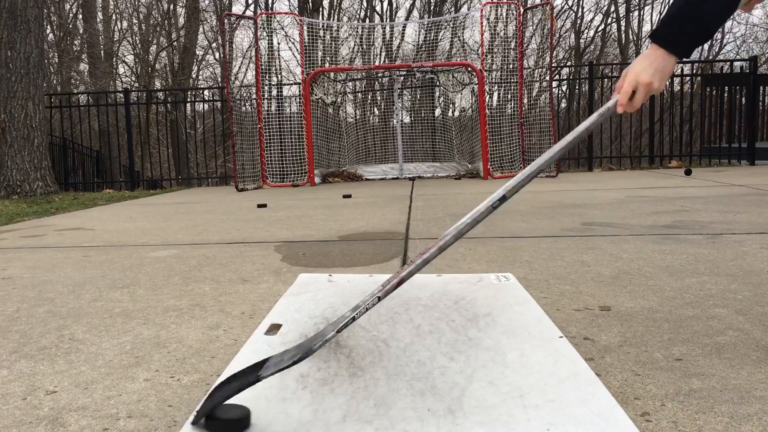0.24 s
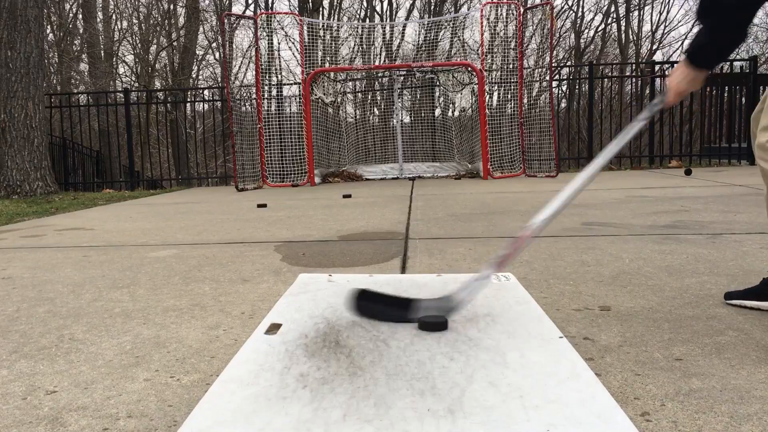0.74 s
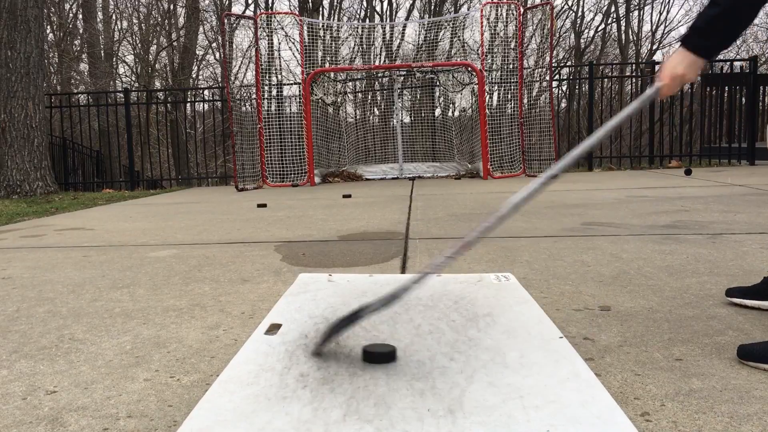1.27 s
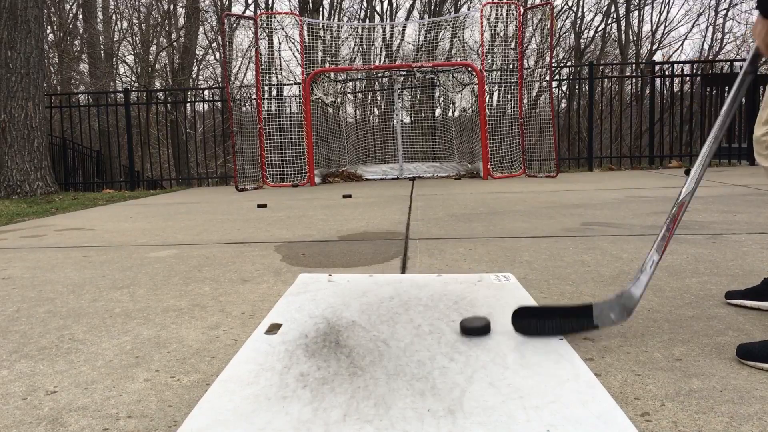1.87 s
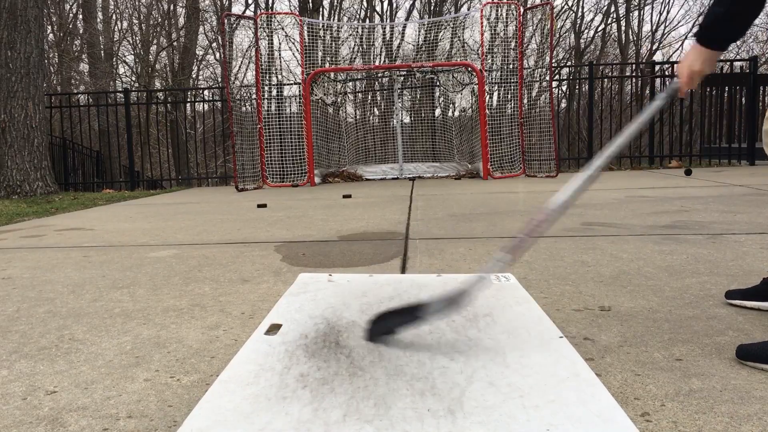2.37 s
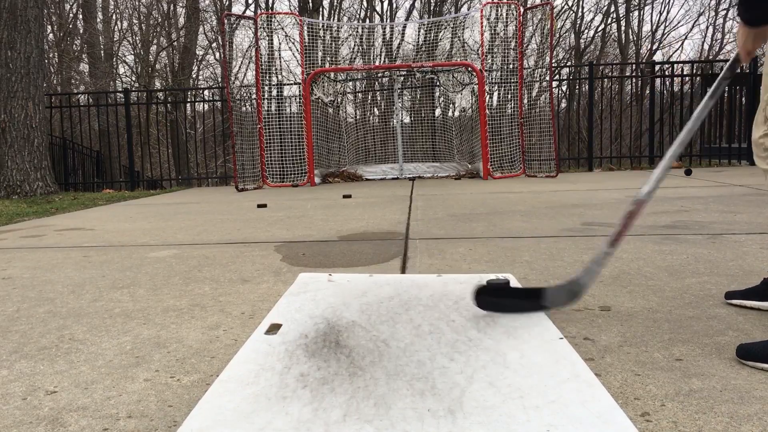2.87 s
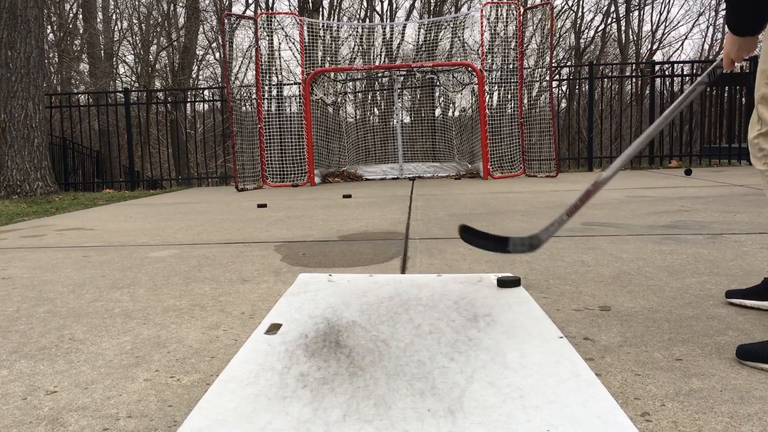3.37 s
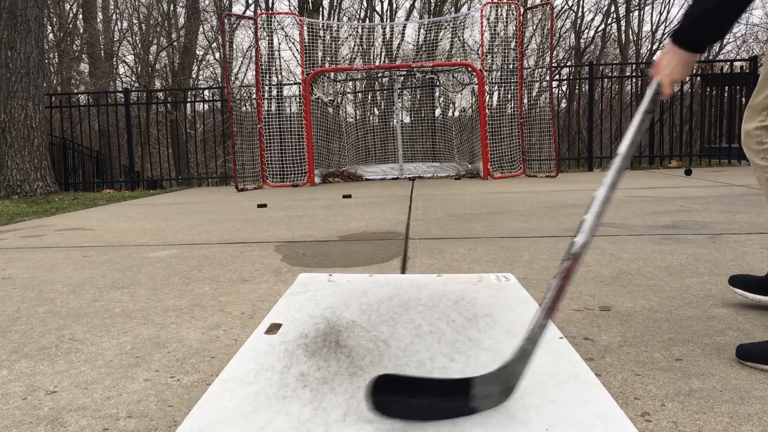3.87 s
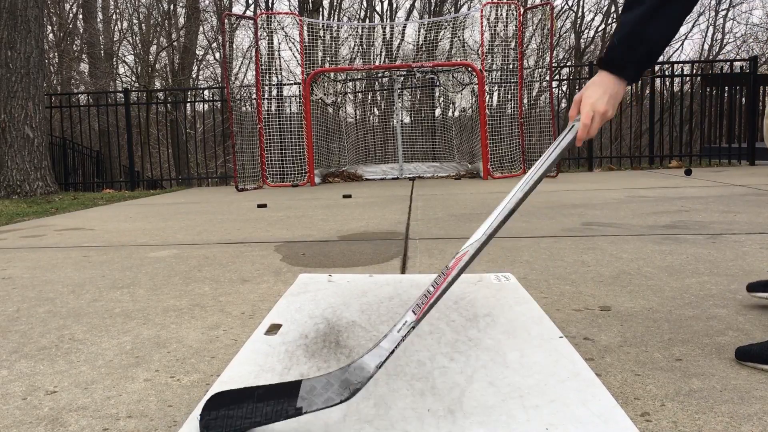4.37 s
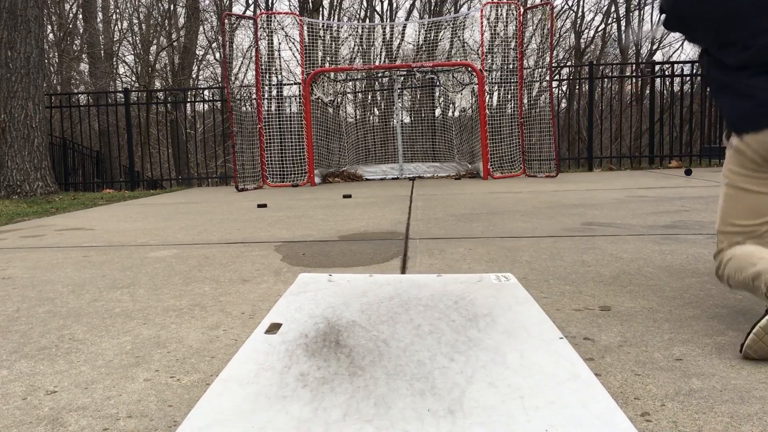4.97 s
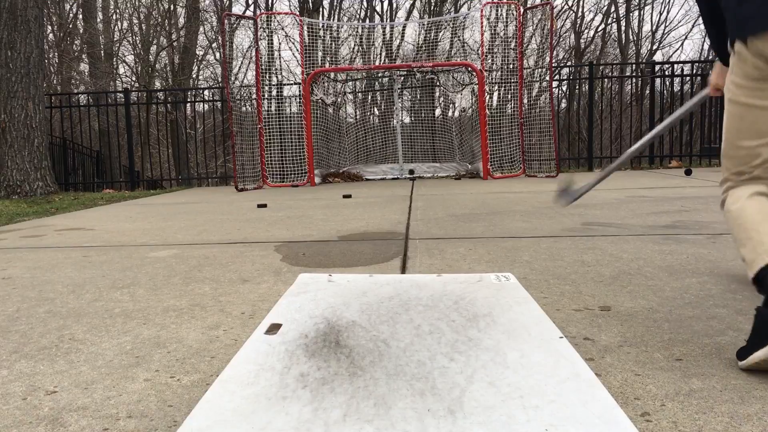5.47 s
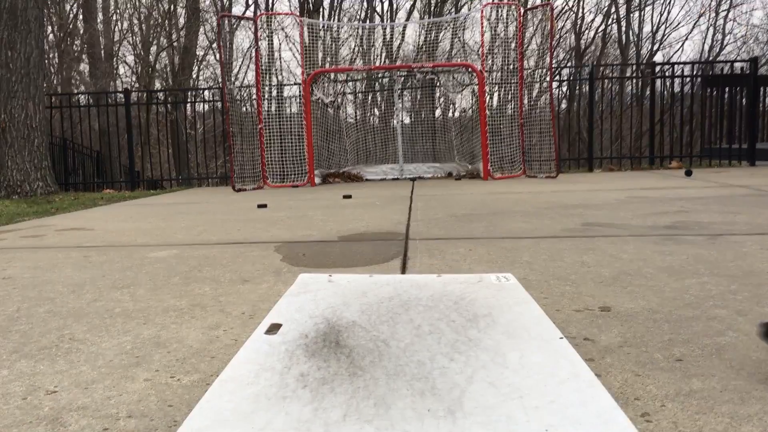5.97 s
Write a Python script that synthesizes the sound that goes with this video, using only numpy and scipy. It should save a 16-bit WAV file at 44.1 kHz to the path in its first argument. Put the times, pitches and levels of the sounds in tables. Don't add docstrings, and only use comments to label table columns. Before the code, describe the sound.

A taped hockey blade clacks and scrapes a rubber puck around a plastic pad outdoors, ending in a hard crack and a distant knock.

```python
import sys
import numpy as np
from scipy import signal
from scipy.fft import rfft, irfft
from scipy.io import wavfile
from scipy.ndimage import uniform_filter1d

SR = 44100
rng = np.random.default_rng(int(sys.argv[2]) if len(sys.argv) > 2 else 0)


def invert_db(level):
    return 10 ** (np.asarray(level, dtype=float) / 20)


def wav_record(signal):
    frames = np.transpose(np.atleast_2d(signal))
    bounded = np.clip(frames, -1, 1)
    quanta = np.round(bounded * 32767).astype(np.int16)
    wavfile.write(sys.argv[1], SR, quanta)


N = 274919


def rms_one(x):
    return x / np.sqrt(np.mean(x ** 2) + 1e-20)


def in_time(rows):
    s, *columns = np.transpose(rows)
    return [np.interp(np.arange(N) / SR, s, column) for column in columns]


def colour(x, spectrum):
    hz, db = np.transpose(spectrum)
    bin_hz = np.fft.rfftfreq(N, 1 / SR) + 1
    gain_db = np.interp(np.log(bin_hz), np.log(hz), db, -80, -80)
    return rms_one(irfft(rfft(x) * invert_db(gain_db), N))


def drift(rate_hz):
    r = np.exp(-80 * np.pi * rate_hz / SR)
    noise = rng.standard_normal(N // 40 + 2002)
    slow = signal.lfilter([1], [1, -2 * r, r * r], noise)[2000:]
    return np.interp(np.arange(N) / 40, np.arange(len(slow)), rms_one(slow))


def ring(clicks, hz, t60):
    r, w = invert_db(-60 / (t60 * SR)), 2 * np.pi * hz / SR
    return signal.lfilter([0, np.sin(w)], [1, -2 * r * np.cos(w), r * r], clicks + 1e-18)


def grains(shape, per_s, spread_db):
    size_db = spread_db * np.minimum(rng.exponential(1, shape), 4)
    sizes = invert_db(size_db) * rng.choice([-1, 1], shape)
    return rms_one(sizes * (rng.random(shape) < per_s / SR))


def swells(rows):
    power, t = np.full(N, 1e-12), np.arange(N) / SR
    for s, rise_s, fall_s, level_db in rows:
        before = t < s
        span_s = np.where(before, max(rise_s, .01), max(fall_s, .01))
        away = np.minimum(np.abs(t - s) / span_s, 4)
        power += invert_db(2 * level_db - 40 * away ** np.where(before, 2, 1.32))
    return power


def patchy(x, depth_db):
    spectra = signal.stft(x, nperseg=512)[2]
    patches = uniform_filter1d(rng.standard_normal(spectra.shape), size=6, axis=0)
    patches = uniform_filter1d(patches, size=7, axis=1)
    return rms_one(signal.istft(spectra * invert_db(depth_db * rms_one(patches)))[1][:N])


# (fastest at [s], rise [s], fall to -20 dB [s], level [dB])
GLIDES = [(0.0, .05, .35, -50), (.39, 0.062, 0.14, -38), (.63, 0.15, 0.2, -40), (.93, 0.28, 0.12, -37.5),
          (1.05, 0.13, 0.17, -35), (1.2, .15, 0.5, -43), (1.38, 0.061, -0.17, -36),
          (1.56, 0.14, 0.9, -44.5), (1.7, .2, -1.3, -61), (1.92, 0.048, 0.47, -43),
          (2.17, 0.1, 0.17, -38.5), (2.42, 0.4, 0.21, -43), (2.58, 0.2, 0.28, -43.5),
          (2.8, .25, 0.16, -43.5), (3.165, 0.35, 0, -46.5), (3.6, 0.069, 0.34, -44.5),
          (3.79, 0.17, 0.17, -38.5), (3.97, .2, 0.12, -43), (4.19, 0.55, 0.08, -52),
          (4.78, 0.14, -0.07, -32.5), (4.87, 0.17, -0.164, -30)]
# (hardest at [s], rise [s], fall to -20 dB [s], level [dB], extra rumble held flat [dB])
DRAGS = [(0.0, .05, 0.14, -40.5, 8.5), (.2, 0.2, 0.5, -53, 7.5), (.52, 0.12, 0.38, -36.5, -2),
         (.86, 0.17, 0, -42, 9), (1.05, 0.14, 0.6, -41, 0), (1.25, 0.11, -0.14, -39.5, -8),
         (1.46, 0.23, 0.36, -39.5, 2.5), (1.72, 0.37, 0.8, -42, -22), (1.9, 0.18, 0.2, -44.5, 10.5),
         (1.98, 0.063, 0.5, -37.5, 0.5), (2.15, 0.077, 0.3, -43, 1.5), (2.25, 0.15, 0.1, -43.5, -4),
         (2.42, 0.18, 0.3, -37.5, 0), (2.58, .15, -1, -38, -22), (2.68, 0.34, 0.1, -39.5, -3),
         (2.84, 0.12, 0.3, -37.5, 2), (3.0, 0.099, 0.08, -40.5, 7), (3.16, 0.31, -0.53, -51, -1.5),
         (3.2, 0.11, 0.5, -59.5, 6), (3.57, 0.039, 0.06, -32.5, -1), (3.77, .15, 0.5, -38, -6.5),
         (3.98, 0.14, 0.4, -42, 3), (4.2, 0.13, 0.06, -43, -2.5), (4.36, 0.31, 0.3, -63, 8.5),
         (4.7, 0.12, 1.7, -41.5, -8), (4.89, 0.15, 0.12, -30.5, -9), (5.04, 0.13, 0.35, -47.5, -1.5)]
# (hardest at [s], rise [s], fall to -20 dB [s], level [dB])
SWEEPS = [(0.0, .05, 0.45, -54.5), (.39, 0.086, 0.4, -46.5), (1.235, .08, -0.3, -49),
          (1.375, 0.098, 0.1, -47.5), (1.96, .05, -2, -51.5), (2.21, 0.06, -0.7, -52),
          (3.3, 0.33, 0.1, -66.5), (4.25, 0.46, 0.1, -57), (4.72, 0.11, -0.27, -49.5),
          (4.97, 0.4, .15, -48.5), (5.245, .02, 0.2, -44.5), (5.33, .08, -4.7, -66.5),
          (5.63, 0.16, 0.12, -54), (4.5, 0.16, -1.5, -68), (5.7, .1, 1.5, -67), (5.87, 0.021, -0.06, -59),
          (5.98, .2, 0, -67), (6.222, 0.017, .1, -53.5)]
# (pad rumble [dB], blade scrape [dB], puck hiss [dB], fine grit [dB])
GLIDE_FEEDS = (-30, -6.5, -.5, -17)
DRAG_FEEDS = (-1, -1.5, -27.5, -20)
SWEEP_FEEDS = (-2, 5.5, -5, -1.5)
# (frequency [Hz], density [dB per Hz])
PAD_RUMBLE = [(250, -32), (400, -17), (600, -0.5), (720, -2.5), (1000, -7), (1400, -9.5), (1900, -13),
              (3000, -23)]
BLADE_SCRAPE = [(760, -40), (1300, -10), (1410, -4.5), (1940, -5), (2890, -3.5), (3160, -5), (4100, -6),
                (5200, -14), (6760, -14), (11400, -120)]
PUCK_HISS = [(2880, -30), (4900, -16), (5260, -9), (6200, -3.5), (6790, -2), (7200, -2.5), (10600, -27.5),
             (13800, -45.5), (22000, -120)]
FINE_GRIT = [(3000, -40), (6000, -11.5), (9500, -3), (10500, -9.5), (11500, -7), (13000, -12),
             (14500, -12.5), (16000, -18)]


def sliding():
    stutter, out = drift(45), 0
    catches = np.clip(drift(53) - 1.2, 0, 2)
    glide, sweep = swells(GLIDES), swells(SWEEPS)
    drag = swells([row[:4] for row in DRAGS])
    flat_drag = swells([(s, rise, fall, db + extra_db) for s, rise, fall, db, extra_db in DRAGS])
    spectra = (PAD_RUMBLE, BLADE_SCRAPE, PUCK_HISS, FINE_GRIT)
    grain_shares = (0.49, 0.4, 0.6, 0.43)
    for k, (spectrum, grain_share) in enumerate(zip(spectra, grain_shares)):
        power = invert_db(2 * GLIDE_FEEDS[k]) * glide + invert_db(2 * SWEEP_FEEDS[k]) * sweep
        power = power + invert_db(2 * DRAG_FEEDS[k]) * (drag if k else flat_drag)
        force = rng.standard_normal(N) + grain_share * grains(N, 1500, 6.5)
        own_db = 1.3 * drift(12) + 1.3 * drift(50)
        unsteady = invert_db(0.5 * stutter + 2.6 * catches + own_db)
        out = out + np.sqrt(power) * unsteady * patchy(colour(force, spectrum), depth_db=2.0)
    return out


# (strongest at [s], rise [s], fall to -20 dB [s], level [dB])
GUSTS = [(.45, .7, .5, -34), (.8, 0.048, -0.5, -30), (1.45, 0.56, 0.6, -32.5), (1.66, 0.17, 0.08, -23),
         (1.8, 0.17, -0.7, -36), (2.15, 0.28, -0.7, -40), (2.62, 0.078, 0, -26.5), (2.74, 0.063, 0.1, -24),
         (3.1, 0.19, 0.65, -35), (4.2, .15, 1, -31), (4.58, 0.11, 0.24, -24), (4.94, 0.19, -1.5, -34),
         (5.15, 0.23, 0.01, -28.5), (5.3, 0.1, 0.25, -29.5), (5.75, 0.36, 0.6, -33), (5.97, 0.23, 0, -30.5),
         (6.1, 0.061, 0.1, -27)]
# (frequency [Hz], density [dB per Hz])
BUFFET = [(15, 12), (25, -7.5), (42, 7.5), (70, 0.5), (95, -11.5), (130, -15)]
FLUTTER = [(70, -1), (100, 6), (150, 1), (250, -3.5), (400, -13), (520, -23)]
# (time [s], peak [dB])
POPS = [
    (4.251, -18),
    (4.559, -19),
    (4.73, -17.5),
]


def wind():
    calm_db = -48
    gust_db = 10 * np.log10(swells(GUSTS) + invert_db(2 * calm_db))
    buffet = invert_db(gust_db + 1.0 * drift(6.9)) * colour(rng.standard_normal(N), BUFFET)
    flutter_db = -44.5 + 0.12 * (gust_db - calm_db) + 0.5 * drift(15.0)
    flutter = invert_db(flutter_db) * colour(rng.standard_normal(N), FLUTTER)
    pops = np.zeros(N)
    for s, peak_db in POPS:
        pops[int(s * SR)] = invert_db(peak_db)
    return buffet + flutter + ring(pops, 111, 0.056) + 0.28 * ring(pops, 194, 0.09)


# (frequency [Hz], density [dB per Hz])
TRAFFIC = [(150, -13), (250, -13), (320, -4.5), (500, -4.5), (700, -2), (1020, -1.5), (1400, -7.5),
           (2000, -33), (3000, -40), (5000, -35), (10000, -37), (16000, -42)]
# (time [s], pitch [Hz], level [dB])
HUM = [
    (0, 243.5, -44),
    (.52, 244.5, -46.5),
    (.6, 242.1, -55.5),
    (4.0, 243, -57),
    (4.3, 238.6, -49),
    (6.23, 237.8, -53.5),
]
# (time [s], level [dB])
WHINE = [
    (0, -57),
    (5.75, -62.5),
    (5.85, -51),
    (6.1, -56.5),
    (6.23, -85),
]
# (time [s], pitch [Hz], level [dB])
BIRD = [
    (3.475, 7300, -93),
    (3.49, 7600, -77.5),
    (3.505, 8000, -85),
    (3.525, 8400, -78),
    (3.53, 8350, -92),
]


def street():
    traffic = invert_db(-51 + 0.57 * drift(11.0)) * colour(rng.standard_normal(N), TRAFFIC)
    hum_hz, hum_db = in_time(HUM)
    hum = invert_db(hum_db + 3 + 1.5 * drift(5)) * np.sin(2 * np.pi * np.cumsum(hum_hz) / SR)
    whine_hz, whine_width_hz = 988, 9.1
    whine_tone = rms_one(ring(rng.standard_normal(N), whine_hz, 11.0 / whine_width_hz))
    whine = invert_db(in_time(WHINE)[0]) * whine_tone
    bird_hz, bird_db = in_time(BIRD)
    bird = invert_db(bird_db) * np.sin(2 * np.pi * np.cumsum(bird_hz) / SR)
    return traffic + hum + whine + bird


def front(age, strong_hz, end_hz, crack_db):
    sweep_s, t60_s, onset_s = 0.000593, .017, 0.00046
    start_hz = 2100 * invert_db(0.31 * (crack_db + 25.5)) + .8 * strong_hz - end_hz
    turns = end_hz * age + start_hz * sweep_s * (1 - np.exp(-age / sweep_s))
    wave = np.sin(2 * np.pi * turns) * invert_db(-60 * age / t60_s) * np.clip(age / onset_s, 0, 1)
    low_cut = signal.butter(2, .55 * end_hz, "high", fs=SR, output="sos")
    return signal.sosfilt(low_cut, wave)


# (frequency [Hz], level [dB])
BODY = [(200, -6), (390, 3), (590, 3.5), (690, 4), (850, -1), (1010, 6), (1240, 5.5), (1500, 6),
        (1750, 6.5), (2040, 6), (2400, 5), (2700, 9), (3000, 11), (3350, 10), (3750, 2.5), (4300, 7),
        (5300, -1), (6300, 3.5), (6900, -1.5), (7500, -1.5), (8200, 1), (9000, -11.5), (10200, -60),
        (12500, -23)]


def struck(s, peak_db, thud_db, crack_db, strong_hz, end_hz, force):
    hz, level_db = np.transpose(BODY)
    t60 = np.clip(19 / hz, .006, .024)
    age, out = np.arange(SR // 16) / SR, np.zeros(N + SR)
    late = np.clip(age[:, None] - .018 / np.sqrt(hz), 0, 1)
    chance = rng.standard_normal((len(s), 2, len(BODY)))
    for k, (detune, weight) in enumerate(chance):
        treble = np.clip(np.log(hz / 1200) / 2.1, 0, 1)
        share_db = np.where(hz < 480, thud_db[k] + 12.0, (crack_db[k] + 19.0) * treble)
        near_db = 4.5 * np.exp(-(np.log(hz / strong_hz[k]) / .4) ** 2)
        gain = invert_db(peak_db[k] + level_db + share_db + near_db - 19.5) * (-1) ** np.arange(len(hz))
        uneven = invert_db(1.8 * weight)
        modes = np.sin(2 * np.pi * hz * (1 + .03 * detune) * late) * invert_db(-60 * late / t60)
        body = modes @ (gain * uneven)
        body += invert_db(peak_db[k] - 4) * front(age, strong_hz[k], end_hz[k], crack_db[k])
        sound = signal.fftconvolve(force[k], body)
        out[int((s[k] + .0005) * SR):][:len(sound)] += sound
    return out[:N]


# (time [s], peak [dB], pad thud re peak [dB], t60 [s], strongest ring [Hz])
BRUSHES = [(0.303, -25, -21, 0.69, 670), (0.619, -11, -11, 0.093, 1730), (1.448, -10.5, -19, 0.063, 607),
           (1.614, -28, -14, 0.1, 678), (1.839, -12.5, -10, 0.09, 990), (1.963, -12.5, -25, 0.13, 2380),
           (2.646, -16, -26, 0.047, 580), (3.049, -16.5, -26, 0.12, 2720), (3.588, -9, -24, 0.13, 3070),
           (3.633, -12, -28, 0.096, 3120), (3.913, -8, -26.5, 0.11, 680), (4.99, -17, 6, 0.077, 2340),
           (5.018, -16, -4.5, 0.22, 579), (5.236, -44, -17, 0.1, 3270), (5.249, -14, -6, 0.092, 1520),
           (5.86, -15.5, -9, 0.063, 4140), (6.217, -17, -9, 0.07, 1000)]
# (time [s], peak [dB], t60 [s], strongest ring [Hz])
SNAGS = [(1.164, -18.5, 0.092, 568), (1.197, -21, 0.16, 638), (1.936, -22, 0.04, 2690),
         (1.959, -15.5, 0.13, 7200), (1.991, -18, 0.11, 1000), (2.063, -25, 0.057, 710),
         (2.189, -17, 0.086, 690), (2.399, -12, 0.15, 716), (3.189, -36, 0.063, 890),
         (5.279, -23.5, 0.066, 1860), (5.299, -36.5, 0.11, 2600)]


def scuffs():
    brush_crack_db, snag_crack_db, snag_thud_db = -17.5, 1, -29
    rows = [row + (brush_crack_db,) for row in BRUSHES]
    rows += [(s, db, snag_thud_db, t60, hz, snag_crack_db) for s, db, t60, hz in SNAGS]
    s, peak_db, thud_db, t60, strong_hz, crack_db = np.transpose(sorted(rows))
    age = np.arange(SR // 4) / SR
    envelope = np.clip(age / 0.0016, 0, 1) * invert_db(-60 * age / np.clip(t60[:, None], .02, 1))
    force = 0.036 * grains((len(s), len(age)), 2600, 5.0) * envelope
    return struck(s, peak_db, thud_db, crack_db, strong_hz, .8 * strong_hz, force)


# (time [s], peak [dB], pad thud re peak [dB], crack re peak [dB], strongest ring [Hz])
LANDINGS = [(0.5425, 0, -5.5, -26, 843), (0.812, -3, -3, -31, 980), (1.0305, -10, -0.5, -39.5, 710),
            (1.115, -22.5, 4, -46, 500), (1.584, 0, -4.5, -21.5, 620), (1.8128, -0.5, -13, -22, 2090),
            (2.0358, -6, -7, -26, 905), (2.618, 2, -5.5, -26, 630), (3.5253, -1, -10, -23.5, 585),
            (3.9685, -0.5, 0, -26.5, 810), (4.8955, 4, -32, -14.5, 594), (4.8985, -5, -27, -22, 905),
            (4.9027, -2, -9.5, -18.5, 554), (4.9197, -3, -19, -15, 550), (5.896, -27.5, -8, -41, 1006)]
# (time [s], peak [dB], crack re peak [dB], rattle re peak [dB], strongest ring [Hz])
KNOCKS = [(0.7868, -4, -22.5, -13.5, 1040), (0.870, -20, -45, -22, 696), (0.883, -11, -39.5, -28, 735),
          (0.889, -14, -45, -20, 900), (1.3796, -17.5, -12, -3.5, 579), (1.4193, -12.5, -14.5, -4.5, 593),
          (1.424, -14.5, -26, -14, 990), (1.597, -16.5, -26, -9, 1000), (1.7898, -3.5, -22, -10, 1060),
          (1.816, -0.5, -30, -45, 1550), (2.1157, -10.5, -38, -8, 810), (2.374, -10, -13, -34, 729),
          (2.4215, -7, -36, -12, 800), (2.455, -17.5, -42, -15, 690), (2.6203, -6, -24, -31, 2430),
          (2.623, -2.5, -40, -16, 1100), (2.8023, -10.5, -33, -9.5, 933), (2.9434, -2, -18.5, -13, 2090),
          (2.9463, -15.5, -18, -21.5, 1510), (3.534, -17, -30, -8, 641), (3.5369, -10, -17, -25, 1530),
          (3.5433, -14, -22, -22, 1190), (3.885, -6, -5.5, -14.5, 1380), (3.891, -4.5, -24, -7.5, 745),
          (4.0007, -17, -30, -7, 1020), (4.405, -54, 2, -38, 5000), (4.8923, 0.5, -23.5, -13.5, 1200)]


def blows():
    landing_rattle_db, knock_thud_db = -20.5, -39.5
    pad_hz = 390
    rows = [row + (landing_rattle_db, pad_hz) for row in LANDINGS]
    rows += [(s, db, knock_thud_db, crack, hz, rattle, .8 * hz) for s, db, crack, rattle, hz in KNOCKS]
    s, peak_db, thud_db, crack_db, strong_hz, rattle_db, end_hz = np.transpose(sorted(rows))
    age = np.arange(SR // 4) / SR
    rattling = invert_db(rattle_db[:, None] - 60 * age / 0.2)
    crushing = invert_db(-13.0 - 60 * age / 0.027)
    force = .12 * grains((len(s), len(age)), 1500, 3.56) * (rattling + crushing)
    soft = np.exp(-2 * np.pi * 5000 / SR)
    force = signal.lfilter([1 - soft], [1, -soft], force)
    force[:, 0] = 1
    return struck(s, peak_db, thud_db, crack_db, strong_hz, end_hz, force)


# (time [s], peak [dB], bright ring [Hz], dull ring re peak [dB])
TICKS = [(1.0258, -11, 6300, -6.5), (1.036, -16, 6460, -20), (1.422, -9, 6850, -17), (1.4504, -26, 3440, 1),
         (1.9369, -18, 8250, -6), (1.939, -21, 7400, -9), (1.95, -24, 8000, -8), (1.955, -13, 7350, -22),
         (1.9597, -17, 7300, -5), (1.9644, -12, 8450, -12), (1.9677, -17.5, 7360, 3),
         (1.9716, -21, 8000, -1), (1.9762, -19, 7000, -8), (1.9912, -26, 8450, -6),
         (2.016, -11.5, 7200, -4.5), (2.0233, -15, 7400, -10), (2.0307, -14, 7650, 3.5),
         (2.0343, -15, 7700, 2), (2.0648, -27, 3500, -2), (2.089, -22, 6800, -23), (2.3731, -14, 6200, -6),
         (2.9427, -2, 7250, -12), (3.0512, -26.5, 7100, 4), (3.194, -43, 7500, -9),
         (3.6317, -20.5, 6700, 7), (3.640, -28, 6550, 2.5), (3.648, -31, 6000, 3.5),
         (3.886, -6.5, 7070, -3), (4.8497, -15, 6260, -12), (4.8512, -19, 6300, -12),
         (4.9887, -30, 9000, 3), (4.9985, -36, 8000, -3)]


def ticks():
    bright_t60_s, dull_hz, dull_t60_s = 0.0041, 2600, 0.0056
    age, out = np.arange(SR // 50) / SR, np.zeros(N)
    detunes = rng.normal(1, 0.13, len(TICKS))
    for (s, peak_db, hz, dull_db), detune in zip(TICKS, detunes):
        onset = np.clip(age / 0.00026, 0, 1)
        bright = np.sin(2 * np.pi * hz * age) * invert_db(-60 * age / bright_t60_s) * onset
        dull = np.sin(2 * np.pi * dull_hz * detune * age) * invert_db(dull_db - 60 * age / dull_t60_s)
        out[int(s * SR):][:len(age)] += invert_db(peak_db + 1.0) * (bright + dull)
    return out


# (frequency [Hz], level [dB], t60 [s])
PUCK = [(430, -0.5, 0.0085), (830, -3, 0.018), (1220, -0.5, 0.039), (1550, -3.5, 0.041), (1884, -3, 0.039),
        (2600, -4.5, 0.0089), (3870, -4.5, 0.0028)]


def drop():
    s, peak_db = 5.5235, -17.5
    clicks = np.zeros(N)
    clicks[int(s * SR)] = invert_db(peak_db)
    clicks[int((s + .003) * SR)] = invert_db(peak_db - 12.0)
    clicks = np.convolve(clicks, np.hanning(10) / 4.5, "same")
    return sum((-1) ** k * invert_db(level_db) * ring(clicks, hz, t60)
               for k, (hz, level_db, t60) in enumerate(PUCK))


# (delay [s], level [dB])
ECHOES = [
    (0.0118, -20.5),
    (0.0275, -16),
    (.0469, -22),
    (0.095, -37),
]


def yard(x):
    dull, out = signal.lfilter([.55], [1, -.45], x), x.copy()
    for s, level_db in ECHOES:
        lag = int(s * SR)
        out[lag:] += invert_db(level_db) * dull[:-lag]
    return out


def scene():
    rub_and_air = sliding() + wind() + street()
    hits = scuffs() + blows() + ticks() + drop()
    return (rub_and_air + yard(hits))[None]


def roll_off(x):
    return signal.sosfilt(signal.butter(12, 16480, fs=SR, output="sos"), x)


def record(dry):
    squeezed = np.tanh(dry / 1.026) * 1.164
    top_cut = signal.cheby2(10, 24, 15850, fs=SR, output="sos")
    mix = signal.sosfilt(top_cut, squeezed)
    return roll_off(mix)


dry = scene()
out = record(dry)
wav_record(out)
```